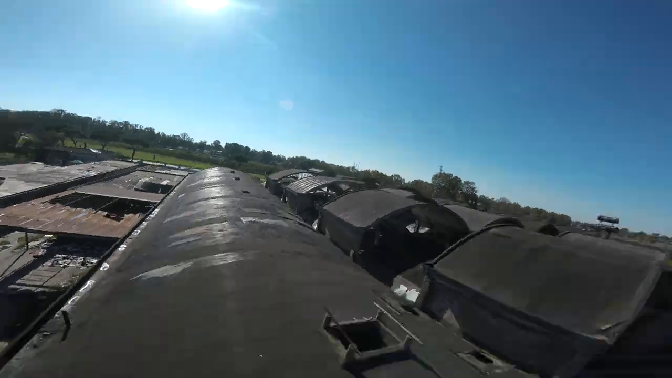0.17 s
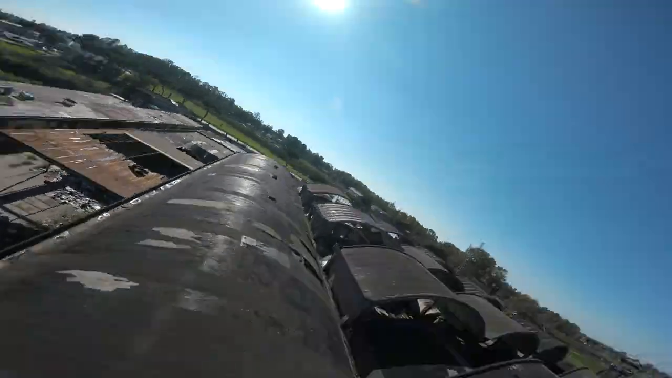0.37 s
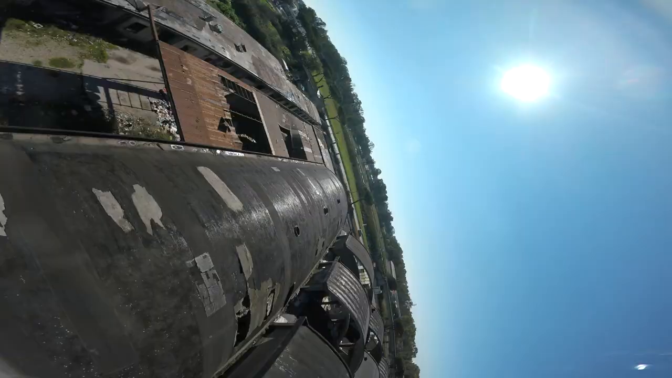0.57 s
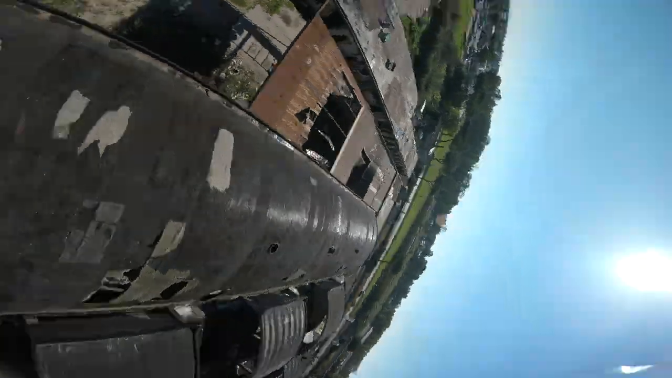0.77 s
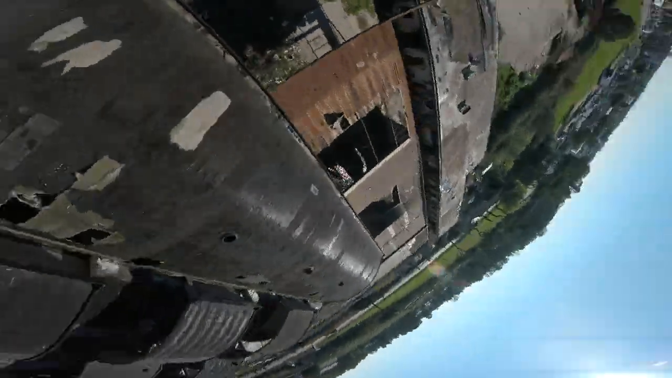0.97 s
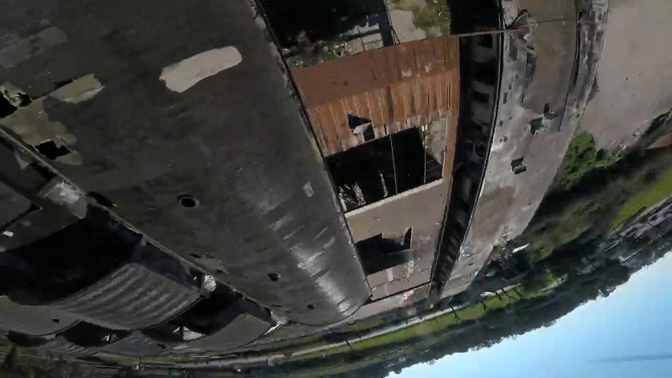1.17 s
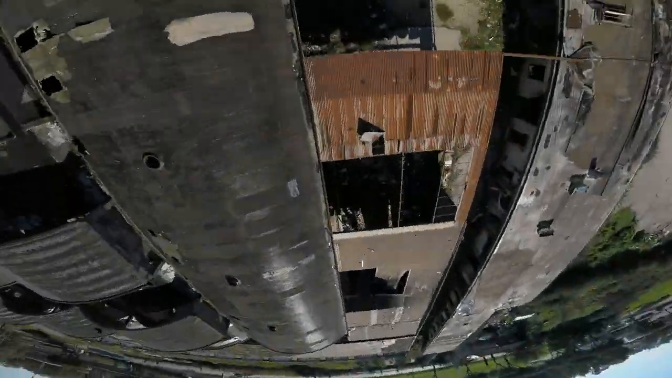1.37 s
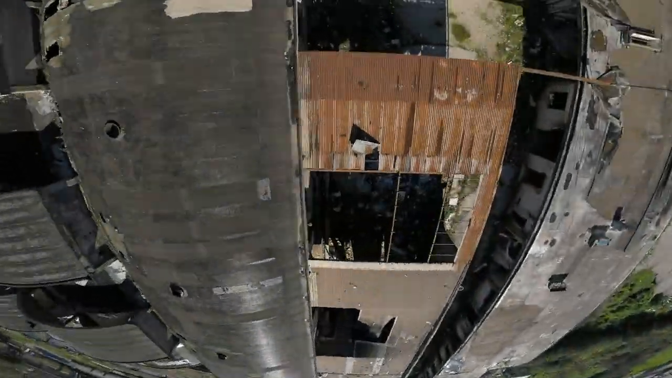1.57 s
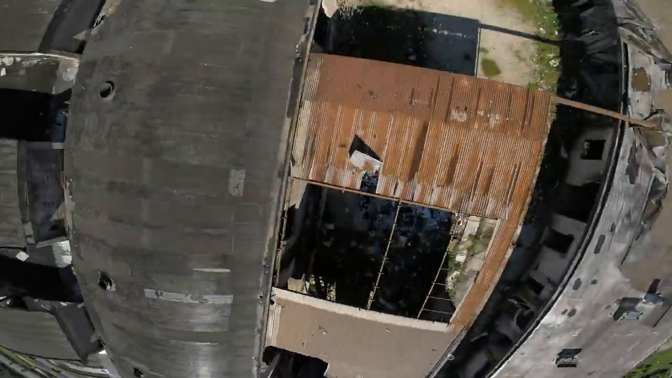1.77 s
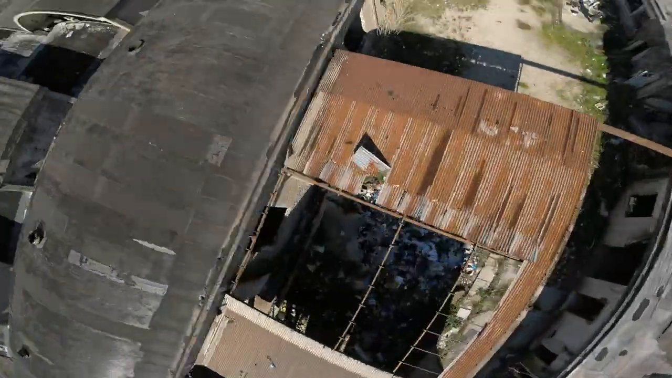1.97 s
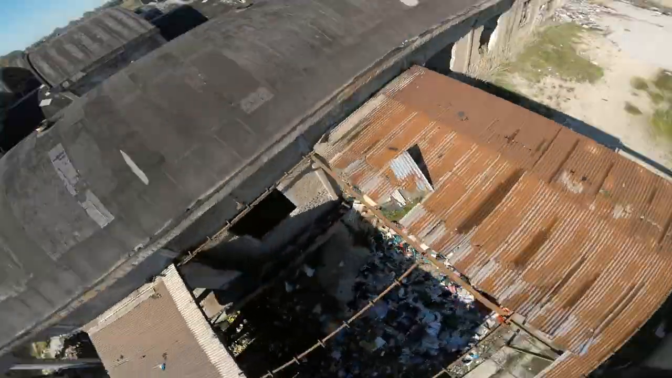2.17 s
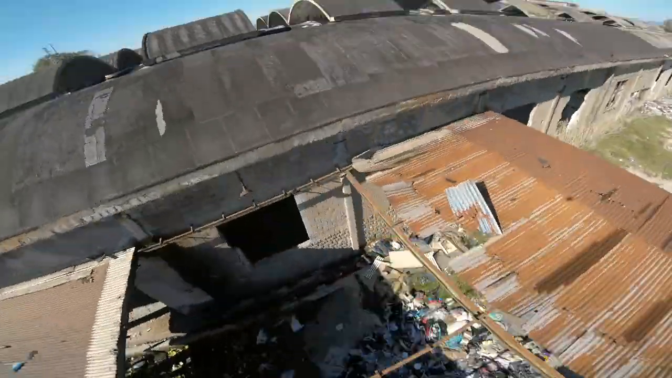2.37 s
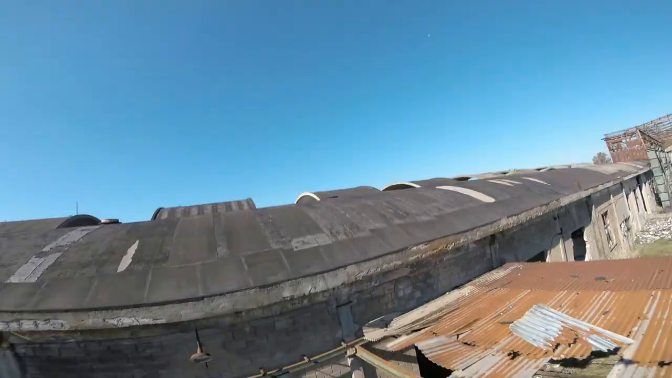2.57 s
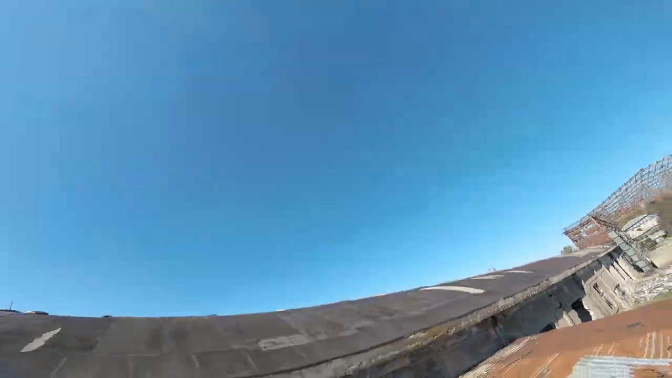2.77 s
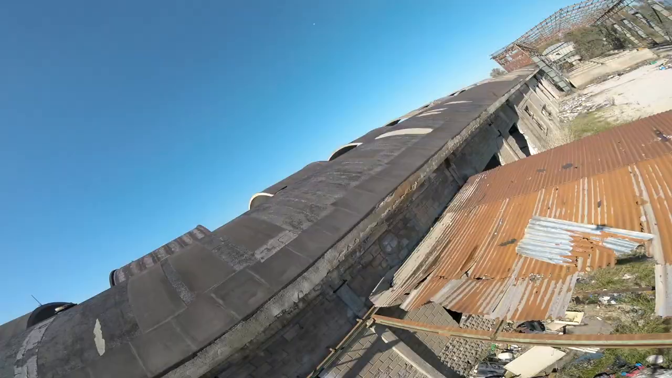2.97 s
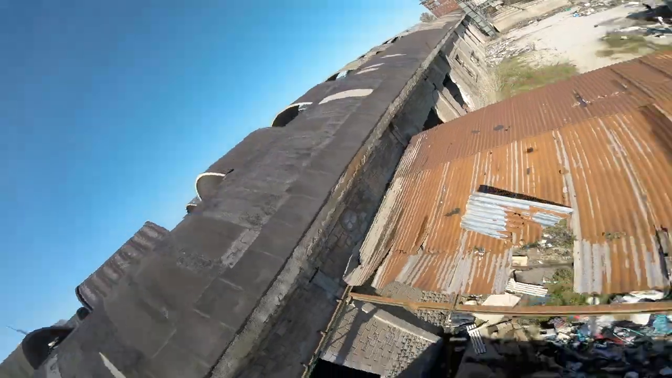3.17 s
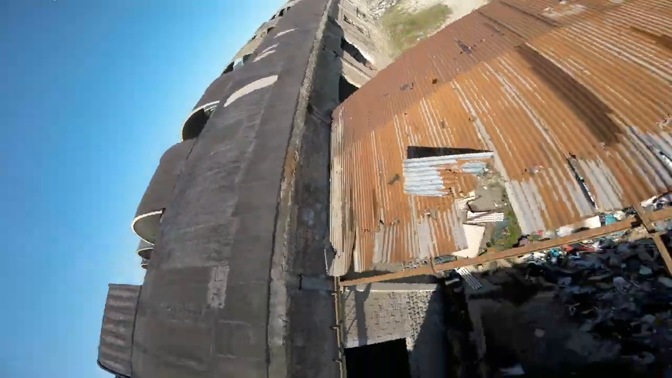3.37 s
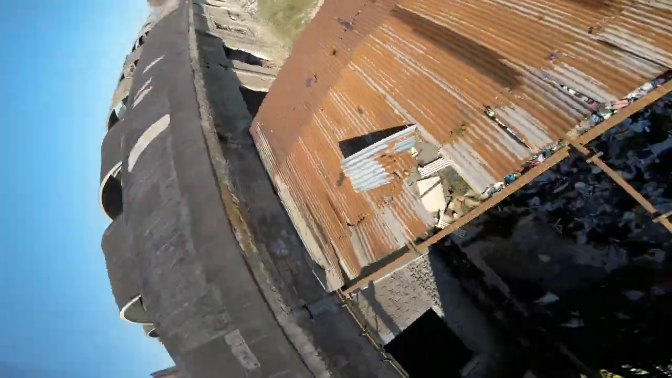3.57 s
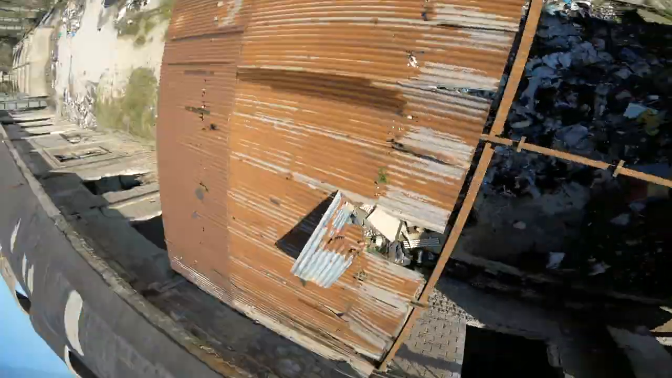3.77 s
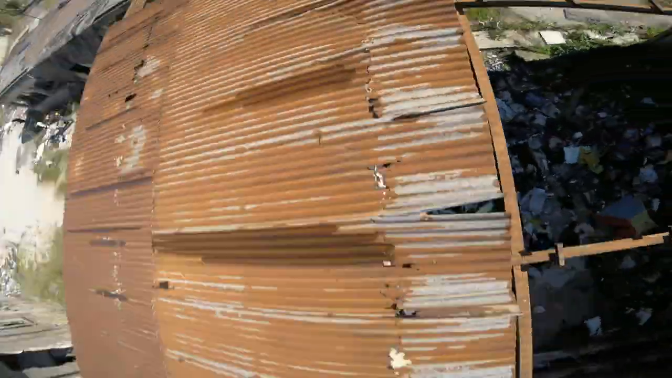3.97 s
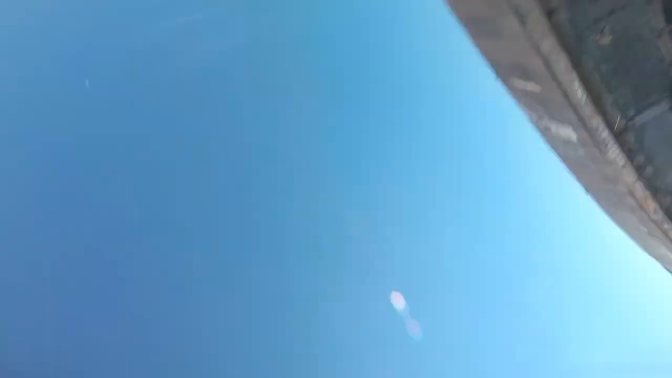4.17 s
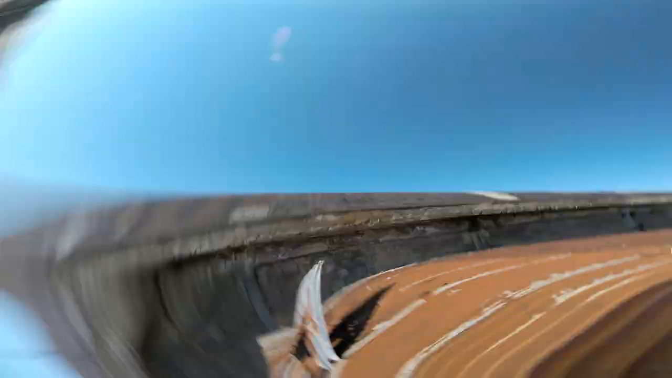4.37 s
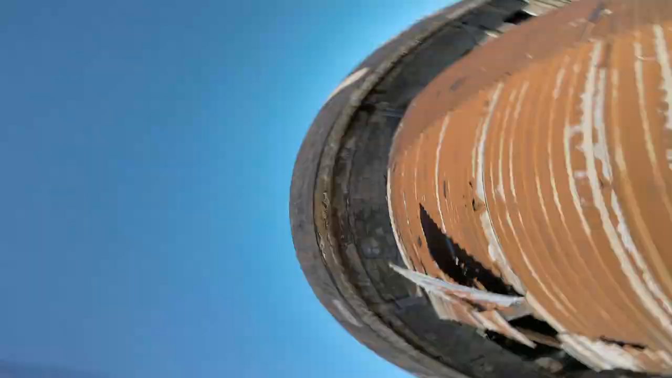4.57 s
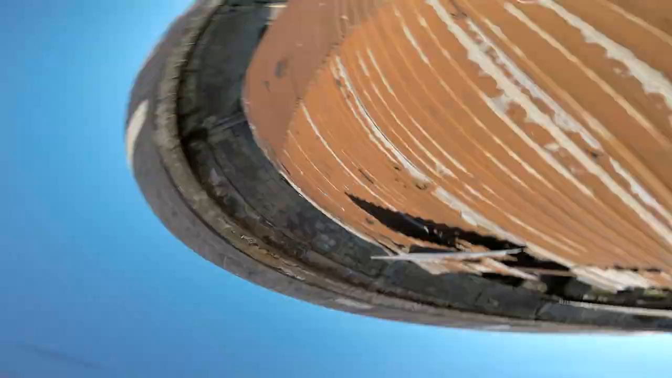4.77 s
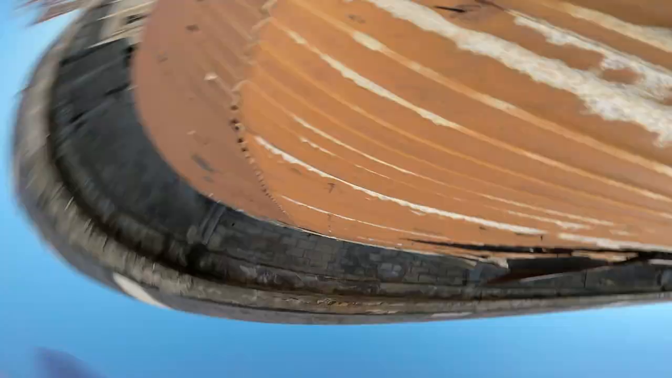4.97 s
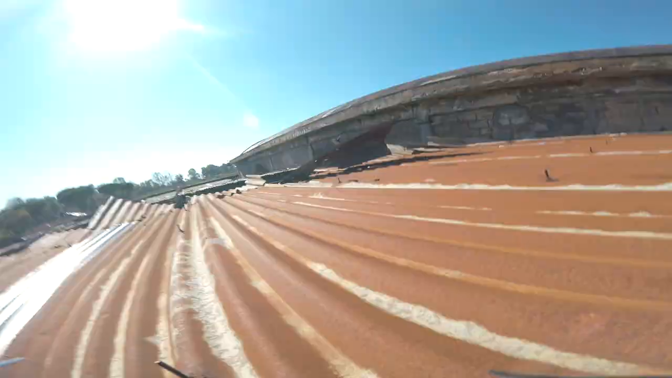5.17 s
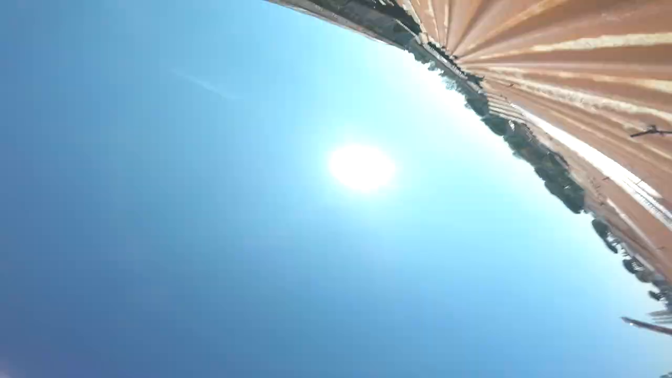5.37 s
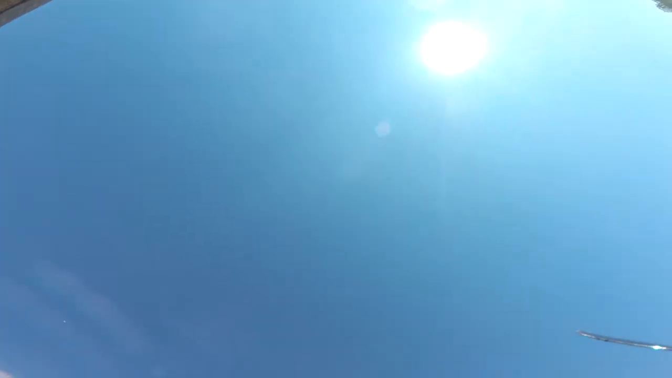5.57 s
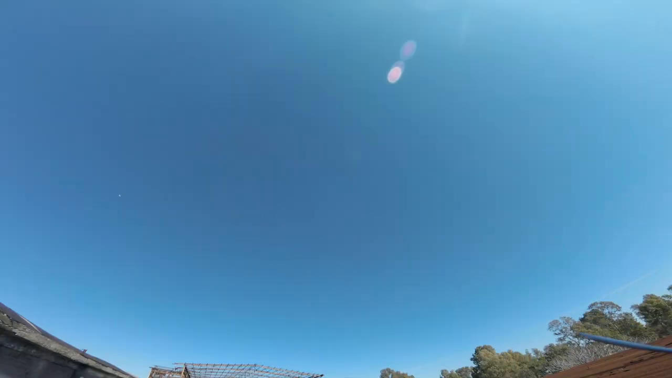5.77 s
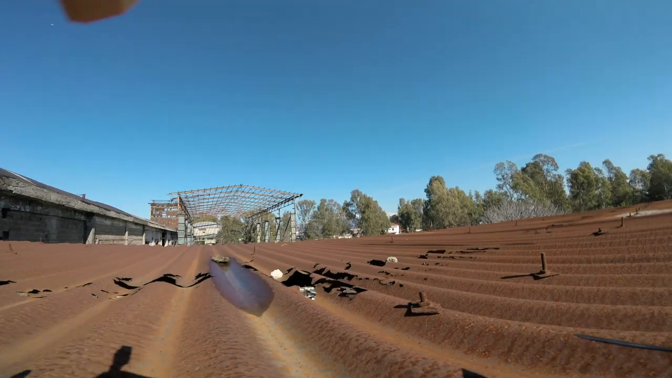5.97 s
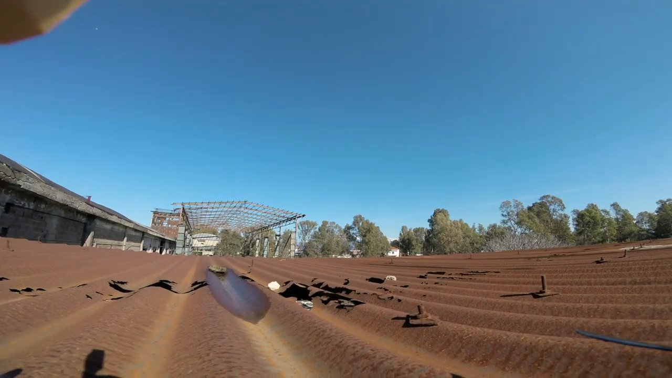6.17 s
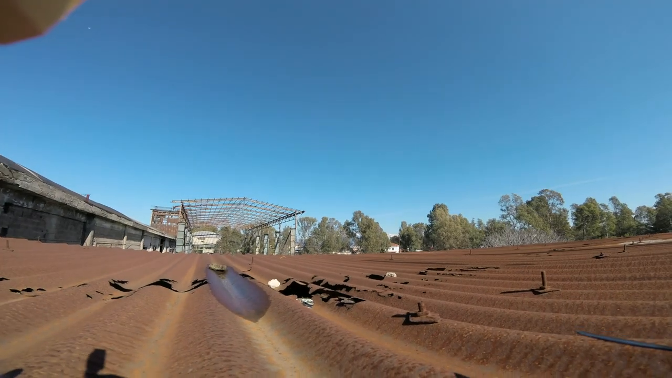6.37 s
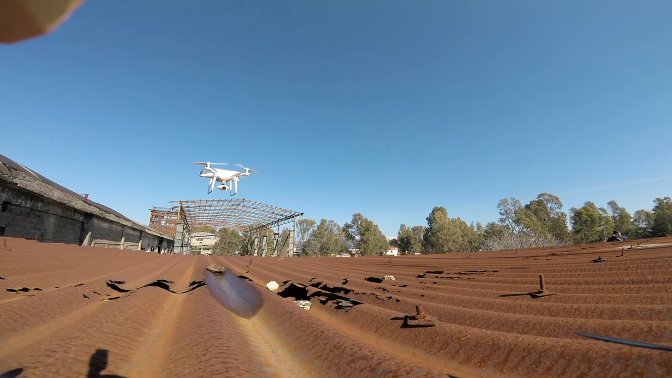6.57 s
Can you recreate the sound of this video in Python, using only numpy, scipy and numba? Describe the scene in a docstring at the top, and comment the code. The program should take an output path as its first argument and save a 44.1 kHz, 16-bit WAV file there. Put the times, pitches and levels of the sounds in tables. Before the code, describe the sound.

Heard from aboard a small drone outdoors: rotors buzz upward, drop to a low flutter, rev again, then idle with thin wavering motor whines. Frantic surges end in a hard strike and squeaky scrape on roof metal. The motors stop; after a quiet gap of soft wind, irregular dull knocks and clicks tumble along, then settle. A steady whine cuts in at the very end.

```python
"""Small drone falls on a tin roof

Microphone on board, in the camera of a small four-rotor drone that swoops over a tin roof, rotors close by.
Rotors are sums of shaft and blade overtones that follow speed curves; air is noise through resonances.
A rotor strikes, the motors stop, and the drone tumbles over the sheets: ragged bursts of contacts
ring decaying modes as dull knocks and clicks. At the very end steady tones and noise cut in as a whine."""
import sys
import numpy as np
from scipy import signal
from scipy.io import wavfile
from scipy.ndimage import uniform_filter1d, minimum_filter1d
from numba import njit

SR = 44100
rng = np.random.default_rng(int(sys.argv[2]) if len(sys.argv) > 2 else 0)


def inscribe(sig):
    """Save sig as 16-bit PCM at rate SR to the path in sys.argv[1].

    A 1-D sig is mono; a 2-D sig holds one channel per row.
    Samples are clipped to [-1, 1] before scaling.
    """
    pcm = np.round(np.clip(np.atleast_2d(sig).T, -1, 1) * 32767)
    wavfile.write(sys.argv[1], SR, pcm.astype(np.int16))


N = 292294
ROTORS_STOP_S = 4.248


def undb(db):
    """Decibels to gain."""
    return 10 ** (np.asarray(db) / 20)


def columns(rows, fade_s=0.0022):
    """Table columns at every sample, and a gate that is open while the table lasts."""
    s, *cols = np.transpose(rows)
    t = np.arange(N) / SR
    since_start = t - s[0] + (s[0] < .02)  # a table from time zero is open at once
    gate = np.clip(np.minimum(since_start, s[-1] - t) / fade_s, 0, 1)
    curves = [uniform_filter1d(np.interp(t, s, col), size=400) for col in cols]
    return (gate, *curves)


@njit
def svf(x, hz, width):
    """State-variable band-pass, gain 1 at the centre."""
    y, band, low = np.empty(len(x)), 0., 0.
    g, k = np.tan(np.pi * hz / SR), width / hz
    for i in range(len(x)):
        v = (band + g * (x[i] - low)) / (1 + g * (g + k))
        band, low, y[i] = 2 * v - band, low + 2 * g * v, k * v
    return y


def walk(rate):
    """Random levels held 1 / rate s and slewed twice; spread near 1."""
    hold = int(SR / rate)
    steps = np.repeat(rng.standard_normal(N // hold + 1), hold)
    return 1.3 * uniform_filter1d(uniform_filter1d(steps, hold), hold)[:N]


def coloured(peaks, flicker_db=0., rate=20, grain=1):
    """Noise (times a grain envelope) through steep resonances that flicker alone; rms 1 at a 0 dB peak."""
    out = 0
    for hz, width, db in peaks:
        noise = grain * rng.standard_normal(N)
        band = svf(svf(noise, hz, width), hz, width)
        out = out + band / band.std() * undb(db + flicker_db * walk(rate))
    return out


def mix(levels_db, layers):
    """Sum of layers, each at its own moving level."""
    return sum(undb(db) * layer for db, layer in zip(levels_db, layers))


def tails(times, dbs, decay_s):
    """An envelope that rises within 2 ms at each time and dies away exponentially."""
    jumps = np.zeros(N)
    np.add.at(jumps, (times * SR).astype(int), undb(dbs))
    decay = signal.lfilter([1], [1, -np.exp(-1 / (decay_s * SR))], jumps)
    return uniform_filter1d(decay, size=90, origin=44)  # the window looks back only


RATTLES_PER_S = 260


def ticks():
    """A grainy envelope: scattered millisecond ticks over a steady bed."""
    hits = (rng.random(N) < RATTLES_PER_S / SR) * undb(2.5 * rng.exponential(size=N))
    return .6 + uniform_filter1d(hits, size=40) * 40


# hiss of the microphone: f/Hz, width/Hz, level/dB
MIC_HISS = [(8800, 3500, -91)]


def mic_hiss():
    """Steady faint noise of the microphone itself."""
    return coloured(MIC_HISS)


# air over the frame, close to the microphone: t/s, then level/dB of deep gusts, buffeting, frame rush,
# low wash, high wash, blade hiss
AIR = [(0.0, -31, -14, -24, -32, -39, -43), (0.06, -35, -36, -30, -41, -54.5, -51),
       (0.23, -29.5, -18, -27.5, -39, -40, -42.5), (0.47, -34, -22.5, -28.5, -37, -44, -38.5),
       (0.55, -31, -17, -27, -31, -36.5, -43), (0.63, -35, -33, -34.5, -43, -58, -69),
       (0.67, -45, -21, -28.5, -51, -58, -65), (0.92, -26, -18, -27.5, -51, -52.5, -60.5),
       (1.01, -38, -18, -26.5, -50, -51, -59), (1.11, -24, -24.5, -27, -52, -49.5, -57),
       (1.3, -31, -18.5, -32, -48.5, -47, -56), (1.58, -31, -20.5, -29, -41.5, -47.5, -58.5),
       (2.07, -26.5, -11, -20.5, -32, -32.5, -37), (2.23, -30, -24.5, -27, -37, -45, -45.5),
       (2.47, -32, -15, -22, -32, -42, -37.5), (2.74, -35, -20.5, -34, -41, -46, -47),
       (2.92, -32, -29.5, -28.5, -49, -53.5, -60.5), (3.06, -42, -50, -37, -55, -69, -92),
       (3.32, -40, -40, -32.5, -46, -57.5, -69), (3.61, -45, -28.5, -23, -37.5, -47, -61),
       (3.77, -34, -32.5, -22.5, -29, -52, -73), (3.93, -30, -15.5, -16, -35.5, -38.5, -41.5),
       (3.99, -13, -27.5, -22, -32, -40.5, -43), (4.07, -28, -20, -28, -33, -38, -38),
       (4.11, -15, -11, -27, -34, -44, -40), (4.2, -17, -25, -18, -56, -41, -40.5)]
# resonances that colour each of these noises: f/Hz, width/Hz, level/dB
GUSTS = [(29.5, 45, -3.5), (51.93, 69, -2)]
BUFFET = [(87.1, 21, -2.5), (115.7, 34, -5.5), (173, 150, -8.5)]
RUSH = [(267.8, 110, 2), (589, 250, -7.5), (1039, 520, -9.5)]
LOW_WASH = [(1551, 790, 0)]
HIGH_WASH = [(2713, 740, 0), (3550, 1000, -9.5)]
HISS = [(6277, 2200, 0.5), (8040, 1800, -7.5), (9600, 1300, -23)]


def flight_air():
    """Turbulent air on the frame: six bands of noise, each flickering and following its own level."""
    gate, *levels_db = columns([*AIR, (ROTORS_STOP_S, *AIR[-1][1:])])  # the last state holds until the stop
    gusts = coloured(GUSTS, 4, 14)
    buffeting = coloured(BUFFET, 4, 15)
    rush = coloured(RUSH, 1.5, 25)
    low_wash = coloured(LOW_WASH, 1., 40)
    high_wash = coloured(HIGH_WASH, 1., 40)
    hiss = coloured(HISS, 1., 40)
    return gate * mix(levels_db, (gusts, buffeting, rush, low_wash, high_wash, hiss))


# wind and rattle on the silent drone: t/s, then level/dB of wind, soft rush, loose parts rattling
GLIDE = [(4.28, -42, -43, -61), (4.45, -32.5, -48, -65), (4.62, -54.5, -56, -76.5),
         (4.88, -55.5, -55.5, -78.5), (5.0, -42.5, -55.5, -78), (5.13, -41.5, -53, -76),
         (5.59, -32.5, -58, -62.5), (5.74, -43, -58, -76), (5.96, -35.5, -53, -60),
         (6.24, -44.5, -62, -83.5), (6.6, -43.5, -64, -76.5)]
# their resonances: f/Hz, width/Hz, level/dB
SOFT_RUSH = [(229.7, 110, -10.5), (432, 300, -9.5), (754, 130, -16.5)]
RATTLE = [(1096, 4300, -5), (1618, 490, -3), (2130, 800, -9.5), (3367, 1500, -26)]


def glide_air():
    """Soft wind noise once the rotors stand, and grainy noise of rattling loose parts."""
    gate, *levels_db = columns([(ROTORS_STOP_S, *GLIDE[0][1:]), *GLIDE])
    wind = coloured(GUSTS, 8.5, 14) + undb(-12) * coloured(BUFFET, 3.7, 29)
    soft_rush = coloured(SOFT_RUSH, 3, 24)
    rattle = coloured(RATTLE, grain=ticks())
    return gate * mix(levels_db, (wind, soft_rush, rattle))


def rundown():
    """Faint treble ticking while the rotors run down: grainy hiss that dies away."""
    return tails(np.array([ROTORS_STOP_S]), [-60], decay_s=.09) * coloured(HISS, grain=ticks())


CUT_IN_S = 6.603
# steady tones of the cut-in: f/Hz, level/dB
CUT_IN_TONES = [(175, -21.5), (560, -24.5), (5570, -21)]
# its noise: f/Hz, width/Hz, level/dB
CUT_IN_NOISE = [(413, 750, -23.5), (2010, 2800, -39.5), (5530, 1500, -28), (9100, 3700, -47)]


def cut_in():
    """A whine over a low drone and rush, starting at once: steady sines and coloured noise."""
    t = np.arange(N) / SR
    tones = sum(np.sqrt(2) * undb(db) * np.sin(2 * np.pi * hz * t) for hz, db in CUT_IN_TONES)
    return np.clip((t - CUT_IN_S) / 0.00078, 0, 1) * (tones + coloured(CUT_IN_NOISE))


WHINES_PER_BLADE, IDLE_BLADE_DB = 28, 16  # the blade tone is 28 times lower and 16 dB above the whine


def whine(first_db, last_db, track, flicker_db=5):
    """The whine of magnets passing the coils of an idling motor, with its slow blade tone below."""
    start_s, end_s = track[0][0], track[-1][0]
    gate, hz, share = columns([(s, f, (s - start_s) / (end_s - start_s)) for s, f in track])
    phase = 2 * np.pi * np.cumsum(hz * (1 + 0.009 * walk(110))) / SR
    blade = undb(IDLE_BLADE_DB) * np.sin(phase / WHINES_PER_BLADE)
    level = undb(first_db + (last_db - first_db) * share + flicker_db * walk(40))
    return np.sqrt(2) * gate * level * (np.sin(phase) + blade)


# magnets passing the coils, heard at low speed: first level/dB, last level/dB, track of (t/s, whine f/Hz)
WHINES = [(-74.5, -52.5, [(1.1, 8990), (1.27, 8000), (1.42, 7350), (1.55, 6620), (1.63, 6270),
          (1.66, 6530)]), (-72, -58, [(3.09, 5150), (3.125, 5900), (3.18, 5600), (3.22, 5680), (3.27, 5000),
          (3.31, 5150), (3.39, 6000), (3.43, 6050), (3.46, 6500)]), (-74, -60, [(3.08, 4300), (3.11, 5200),
          (3.16, 4950), (3.24, 4200), (3.31, 5900), (3.335, 6100), (3.37, 5400), (3.43, 5500),
          (3.49, 4850)]), (-62, -52, [(3.42, 4150), (3.46, 4550), (3.475, 4300)]),
          (-47, -56, [(3.485, 5500), (3.51, 6600), (3.53, 7300)]), (-53.5, -60, [(3.555, 4400),
          (3.567, 6100), (3.587, 7560), (3.64, 5520), (3.685, 7050), (3.72, 6300), (3.75, 5050),
          (3.78, 5740), (3.86, 8500)]), (-58, -68, [(3.585, 6600), (3.645, 4100)]),
          (-54, -58, [(3.69, 5000), (3.715, 5850), (3.77, 4000)]), (-59, -60, [(3.69, 6354), (3.72, 5200)]),
          (-55, -44, [(3.76, 5000), (3.81, 5750)])]
# a thin tone that flickers in and out while the motors idle
FLICKER_S, FLICKER_HZ, FLICKER_DB, FLICKER_DEPTH_DB = (3.07, 3.9), 6620, (-80, -59), 8
# a motor coasting to rest: start and end, first pitch, time constant, first and last level
SPINDOWN_S, SPINDOWN_HZ, SPINDOWN_LAG_S, SPINDOWN_DB = (4.43, 4.95), 6400, .42, (-84, -92)


def whines():
    """Idling motors, the flickering tone, and the motor whose pitch falls exponentially as it coasts."""
    flicker = whine(*FLICKER_DB, [(s, FLICKER_HZ) for s in FLICKER_S], FLICKER_DEPTH_DB)
    coast_s = np.linspace(*SPINDOWN_S, num=20)
    coast_hz = SPINDOWN_HZ * np.exp((SPINDOWN_S[0] - coast_s) / SPINDOWN_LAG_S)
    coast = whine(*SPINDOWN_DB, list(zip(coast_s, coast_hz)))
    return sum(whine(*row) for row in WHINES) + flicker + coast


# blade tips scraping the sheet: t/s, level/dB
SCRAPES = [(4.215, -21), (4.225, -15.5)]
# resonances of the scrape: f/Hz, width/Hz, level/dB
SCRAPE = [(2950, 510, 3.5), (7400, 980, -2.5), (10040, 720, -10.5), (12060, 700, -8.5)]


def scrapes():
    """Short squeaks of blade on metal: bell-shaped bursts of resonant noise."""
    t = np.arange(N) / SR
    shape = sum(undb(db) * np.exp(-((t - s - .003) / 0.0042) ** 2) for s, db in SCRAPES)
    return shape * coloured(SCRAPE)


def ring(push, modes):
    """Decaying modes (f/Hz, level/dB, t60/s) driven by a train of pushes."""
    out = 0
    for hz, db, t60 in modes:
        pole = np.exp(2j * np.pi * hz / SR - np.log(1000) / (t60 * SR))
        out = out + undb(db) * signal.lfilter([1], [1, -pole], push).imag
    return out


# blows on the roof: t/s, thump peak level/dB, then level/dB against the thump of knock, click, tick
BLOWS = [(4.235, -9, 1, 9, 2), (4.244, -3, -5.5, -29, -40), (4.252, -10.5, 1, -9, -16),
         (4.279, -38, -4, -22, -30), (4.953, -26.5, 3, -25, -39), (4.962, -20, 8, -12, -24),
         (4.975, -0.5, -2, -16, -31), (5.031, -21.5, -7, -19.5, -32), (5.055, -14, -11.5, -23, -56),
         (5.164, -40, 13, -23.5, -34), (5.186, -26, 12, -44.5, -42), (5.202, -8.5, -12.5, -26, -44.5),
         (5.21, -12.5, 0, -34, -33), (5.239, -7, -16, -50, -43), (5.318, -39.5, -17.5, -18, -39),
         (5.352, -27.5, 1, -9, -33), (5.362, -6, -7, -31, -36), (5.405, -18.5, -16, -29, -27),
         (5.504, -17, -12, -38, -47), (5.532, -19, -11, -26, -40), (5.57, -5, -13.5, -27, -58),
         (5.595, -8.5, -25, -26, -32), (5.639, -7.5, -18, -27, -52), (5.718, -13, -16.5, -41, -51.5),
         (5.794, -28, -16.5, -11, -52), (5.805, -0.5, -15, -30, -41), (5.839, -31, -17, -14, -13),
         (5.899, -7.5, -13, -24.5, -46), (5.936, -2, -14.5, -24.5, -50), (5.97, -18, -16, -18, -53),
         (6.028, -10.5, -11.5, -21, -68), (6.104, -20, -22, -24, -53), (6.18, -28.5, -6.5, -23, -60),
         (6.225, -27, -26, -35, -47), (6.258, -29, -15.5, -20, -52.5)]
# modes of each part of a blow: f/Hz, level/dB, t60/s
THUMP = [(51.3, 0, 0.14), (90.5, 10.5, 0.056), (142, 8, 0.058)]
KNOCK = [(278, 14.5, 0.03), (350, 18, 0.014), (510, -2, 0.017), (820, -16.5, 0.017)]
CLICK = [(950, 7, 0.019), (1305, 8, 0.018), (1630, -1.5, .015), (2315, 1, .01), (2995, -24.5, 0.0081),
         (4300, -0.5, 0.01)]
TICK = [(5560, -3, 0.003), (6920, 8, 0.0035), (9000, 2, .004), (11440, -9.5, 0.0044), (13000, -18, .003)]
# noisy tails under click, knock and thump; in the last the roof drums on
SHIVER_DB, SHIVER_S, BOOM_DB, BOOM_S, RUMBLE_DB, RUMBLE_S = -12.5, 0.0094, -14.5, 0.013, -22, 0.051


def blows(size=8192):
    """Each blow is a short ragged burst of contacts; the softer ones drive lower modes; the sheet shivers on."""
    s, db, knock_db, click_db, tick_db = np.transpose(BLOWS)
    t = np.arange(size) / SR
    fade = np.minimum(1, 4 - 4 * t / t[-1])
    out = np.zeros(N + size)
    # level against the thump in dB, modes, burst in s, roughness, softness in samples
    parts = ((0, THUMP, .003, 12., 90), (knock_db, KNOCK, .004, 25., 24),
             (click_db, CLICK, .001, 12., 5), (tick_db, TICK, .0004, 8., 1))
    for rel_db, modes, burst_s, rough, soft in parts:
        # softer contacts smear the force over more samples
        noise = rng.standard_normal((len(s), size))
        ragged = uniform_filter1d(uniform_filter1d(noise, soft), soft)
        burst = t / burst_s * np.exp(-t / burst_s) * (1 + rough * ragged)
        sounds = ring(burst, modes)
        peaks = np.abs(sounds).max(axis=1)
        sounds *= (undb(db + rel_db) / peaks)[:, None] * fade
        for at, sound in zip((s * SR).astype(int), sounds):
            out[at:at + size] += sound
    shiver = tails(s, db + click_db + SHIVER_DB, SHIVER_S) * coloured(RATTLE, grain=ticks())
    boom = tails(s, db + knock_db + BOOM_DB, BOOM_S) * coloured(SOFT_RUSH)
    rumble = tails(s, db + RUMBLE_DB, RUMBLE_S) * coloured(BUFFET)
    return out[:N] + shiver + boom + rumble


# overtones: multiple of the shaft, level/dB against shaft hum or blade tone,
# growth/dB per doubling of speed past CRUISE_HZ
HUM_ORDERS = [(1, -1.5, 1), (2, -28, 9.5)]
BLADE_ORDERS = [(3, 2, 0.5), (6, -11, 10), (9, -26.5, 8.5), (12, -40.5, 10), (15, -40.5, 12),
                (18, -40.5, 10.5)]
CRUISE_HZ = 300


def rotor(rows, bright_db, wobble=.006, wobble_hz=1.5, flutter_db=2.5):
    """Unbalance hums once a turn, three blades sing at three times that; gusts ruffle both."""
    gate, hz, hum_db, blade_db = columns(rows)
    on = gate > 0
    hz_on = hz[on]
    uneven_hz = (hz + (wobble * hz + wobble_hz) * walk(60))[on]
    turn = 2 * np.pi * np.cumsum(uneven_hz) / SR
    # dirty air makes each blade pass uneven: a halo of noise round the blade tones
    halo = 1 + .4 * walk(220)[on]
    out = np.zeros(N)
    for db, orders in ((hum_db, HUM_ORDERS), (blade_db, BLADE_ORDERS)):
        for k, rel_db, growth_db in orders:
            # brightness lifts only the overtones above the blade tone
            overtone_db = growth_db * np.log2(hz_on / CRUISE_HZ) + (k > 3) * bright_db[on]
            level = undb((db + flutter_db * walk(70))[on] + rel_db + overtone_db)
            tone = np.sin(k * turn + 2 * np.pi * rng.random())
            out[on] += level * (halo if k > 2 else 1) * tone
    return np.sqrt(2) * gate * out


# rotors in flight, one curve for each that is heard, the last one idling:
# t/s, shaft turns f/Hz, shaft hum level/dB, blade tone level/dB
ROTORS = [
    [(0, 230.2, -6, -37.5), (.25, 293, -8.5, -28), (.41, 368.1, -10.5, -22), (.47, 381.4, -12, -20.5),
     (.52, 357.5, -14.5, -22), (.57, 239.4, -5, -39), (.605, 140.2, -26, -23), (.63, 95, -36, -8.5),
     (.7, 89.85, -30, -24), (.78, 95.57, -23.5, -8), (.98, 107.5, -21, -16.5), (1.2, 100, -23, -10.5),
     (1.6, 77.1, -26, -23), (1.75, 96.7, -19, -12), (1.86, 123, -20.5, -16.5), (2.03, 183, -38.5, -20.5),
     (2.28, 187.6, -14, -24.5), (2.45, 328.2, -20, -27), (2.62, 376.7, -24.5, -36),
     (2.8, 365.6, -19, -27.5), (2.97, 89.8, -45.5, -31.5)],
    [(0, 242.6, -4.5, -36.5), (.25, 315.8, -14, -31.5), (.42, 387, -20, -22.5), (.47, 405, -32.5, -27),
     (.52, 398, -18.5, -31.5), (.65, 99, -20, -32.5), (.71, 96.25, -28.5, -27), (.85, 114.3, -25.5, -17),
     (1.05, 124.6, -25.5, -31), (1.35, 118, -31.5, -19.5), (1.6, 102.6, -35.5, -19), (1.69, 124, -20, -18),
     (1.87, 158.4, -35, -31.5), (2.06, 246.6, -27, -21.5), (2.26, 250.9, -22.5, -38.5),
     (2.41, 435.6, -38.5, -24), (2.55, 431.8, -38, -25), (2.8, 383.7, -21, -25.5),
     (2.97, 101.3, -58.5, -44)],
    [(1.98, 224, -28, -33), (2.06, 244, -12.5, -51), (2.2, 260.3, 0.5, -32), (2.32, 254.4, -4.5, -32),
     (2.4, 284, -7.5, -32.5), (2.55, 271.8, -6, -24.5), (2.65, 314, -11.5, -27.5),
     (2.71, 362.1, -12.5, -17), (2.79, 369.2, -9, -18.5), (2.89, 228.6, -10.5, -52),
     (2.95, 100.3, -68, -25)],
    [(1.6, 37.4, -56, -30), (1.75, 62.2, -46.5, -21), (1.9, 108.2, -21, -14), (2.02, 171.6, -27.5, -26),
     (2.2, 182.6, -20.5, -27), (2.3, 200.8, -32, -30), (2.4, 392, -27, -32), (2.56, 331, -15.5, -24),
     (2.72, 362.5, -42.5, -30)],
    [(2.98, 99.1, -47, -46), (3.22, 113.3, -44, -37), (3.42, 95.3, -44, -53), (3.56, 85.9, -19, -43),
     (3.69, 80.2, -24.5, -26), (3.74, 76, -44.5, -38)],
]
# shared brightness of the blade overtones: t/s, level/dB
BRIGHT = [(0, 13.5), (.3, 4), (.55, 2), (1.5, 0), (2.3, -1), (2.5, -4.5), (2.8, -4.5)]
# each curve's own overtone level/dB
ROTOR_OVERTONE_DB = [3.5, -4, 5.5, 1.5, 6]


def rotors():
    """Rotors speeding up and slowing down in flight, with shared and own overtone brightness."""
    _, bright_db = columns(BRIGHT)
    return sum(rotor(rows, bright_db + own_db) for rows, own_db in zip(ROTORS, ROTOR_OVERTONE_DB))


FRAME_HZ, FRAME_DB_PER_OCTAVE = 258, 27.5  # a surging shaft shakes the frame most at this speed
CLIMB_DB_PER_OCTAVE, BRAKE_DB_PER_OCTAVE = 4, -1.5  # change of blade level with speed


def surge(start_s, fastest_s, end_s, start_hz, fastest_hz, end_hz, roundness, hum_db, blade_db, overtone_db):
    """Speed climbs and brakes in an arch; the hum peaks where the frame resonates."""
    s = np.linspace(start_s, end_s, num=40)
    braking = s > fastest_s
    climb = (s - start_s) / (fastest_s - start_s)
    brake = (end_s - s) / (end_s - fastest_s)
    near = np.where(braking, brake, climb)
    arch = near + roundness * (np.sin(np.pi / 2 * near) - near)
    hz = fastest_hz - (fastest_hz - np.where(braking, end_hz, start_hz)) * (1 - arch)
    hum = hum_db - FRAME_DB_PER_OCTAVE * np.abs(np.log2(hz / FRAME_HZ))
    slope = np.where(braking, BRAKE_DB_PER_OCTAVE, CLIMB_DB_PER_OCTAVE)
    blade = blade_db + slope * np.log2(hz / fastest_hz)
    return rotor(np.transpose([s, hz, hum, blade]), np.full(N, overtone_db), wobble=.012)


# rotors that surge and brake while the pilot fights the fall: start t/s, fastest t/s, end t/s, start f/Hz,
# fastest f/Hz, end f/Hz, roundness of the arch [0-1], shaft hum level/dB at FRAME_HZ,
# blade tone level/dB at the fastest, overtone level/dB; a row that ends before its start is silent
SURGES = [(3.8, 3.933, 3.94, 77.9, 145.7, 145, 0.06, -10.5, -15.5, 6),
          (3.935, 3.996, 4.04, 143.6, 377.3, 193, 0.16, -5, -17.5, 2.5),
          (4.038, 4.098, 4.138, 275.4, 410.8, 204.7, .9, -8, -17, 0),
          (4.04, 4.143, 4.165, 263.6, 405.8, 373, .9, -10, -19.5, -3.5),
          (4.155, 4.204, 4.24, 279, 377.4, 400, 1, 1, -18, 3.5),
          (4.159, 4.234, 4.126, 253, 369, 364, .5, -4, -21.5, 7.5)]


def surges():
    """Short overlapping bursts of rotor speed before the stop."""
    return sum(surge(*row) for row in SURGES)


# dips of the camera case round the microphone: f/Hz, width/Hz, depth [0-1]
HOUSING = [(2183, 250, 0.3), (4900, 2600, 0.5), (12300, 4000, 0.8)]


def scene():
    """Drone and roof reach the one microphone through the case; cut-in and microphone hiss bypass it."""
    sound = flight_air() + glide_air() + rundown() + whines()
    sound = sound + scrapes() + blows() + rotors() + surges()
    for hz, width, depth in HOUSING:
        sound = sound - depth * svf(sound, hz, width)
    return (sound + cut_in() + mic_hiss())[None]


LOW_CUT_HZ, TOP_HZ = 22, 15700


def record(dry):
    """The microphone drops the deepest bass, a limiter pulls peaks below full scale, the top is cut."""
    dry = signal.sosfilt(signal.butter(2, LOW_CUT_HZ, "high", fs=SR, output="sos"), dry)
    peak = -minimum_filter1d(-np.abs(dry), size=257)
    gain = uniform_filter1d(np.minimum(1, .95 / (peak + 1e-9)), size=257)
    top_cut = signal.ellip(8, .2, 70, TOP_HZ, fs=SR, output="sos")
    return signal.sosfilt(top_cut, dry * gain)


dry = scene()
out = record(dry)
inscribe(out)
```